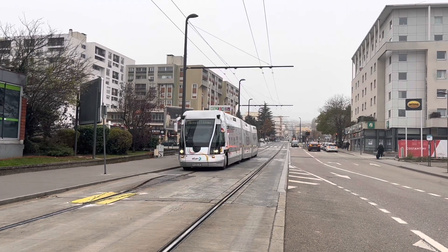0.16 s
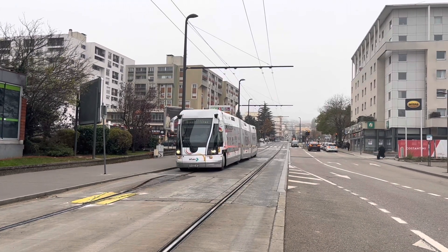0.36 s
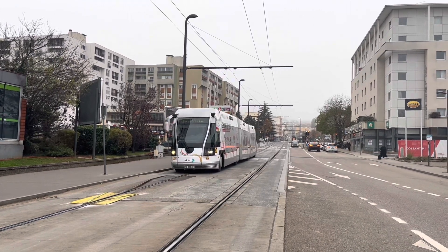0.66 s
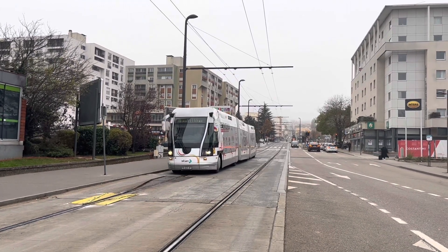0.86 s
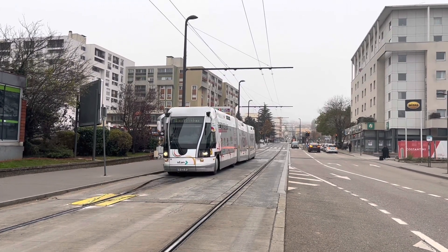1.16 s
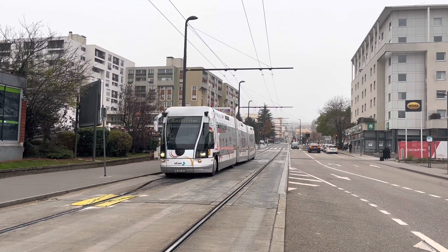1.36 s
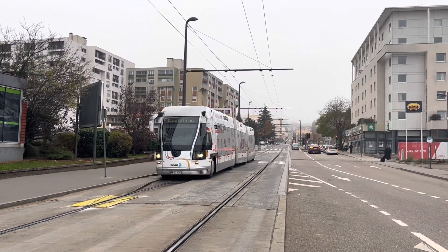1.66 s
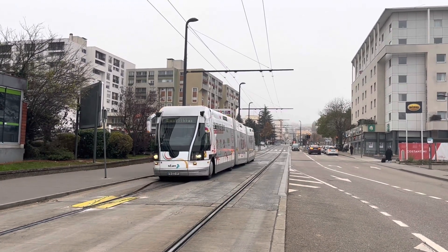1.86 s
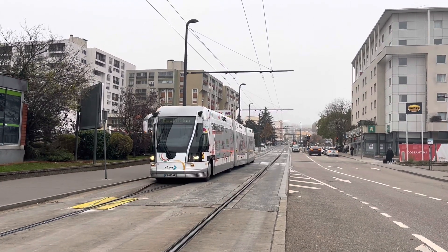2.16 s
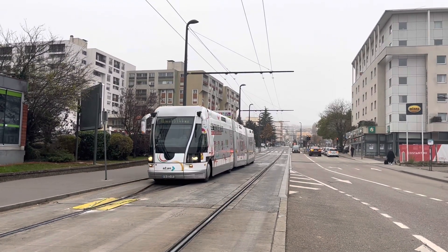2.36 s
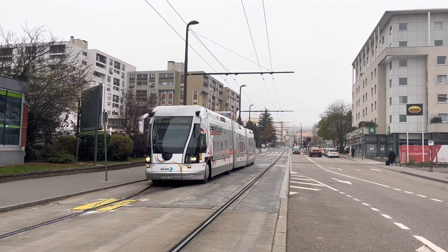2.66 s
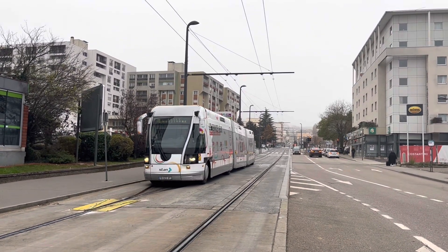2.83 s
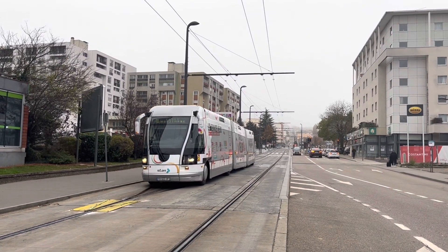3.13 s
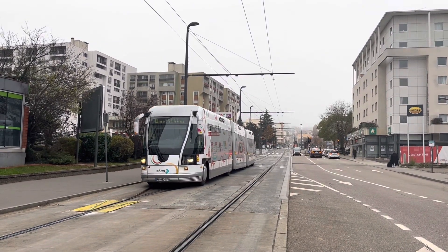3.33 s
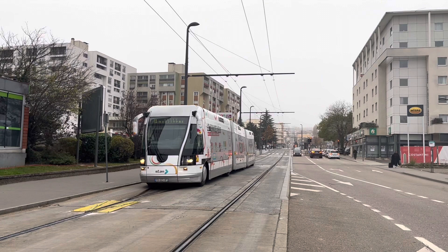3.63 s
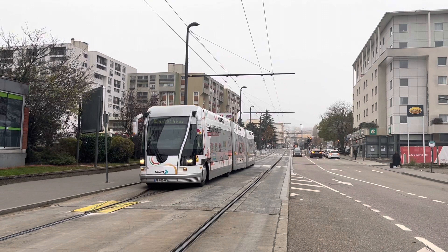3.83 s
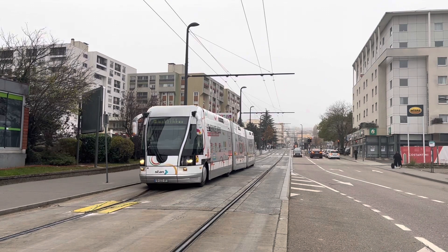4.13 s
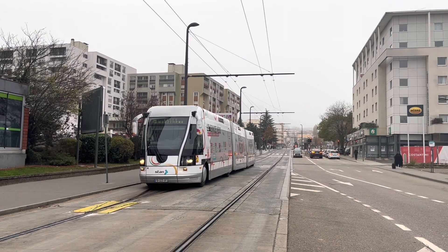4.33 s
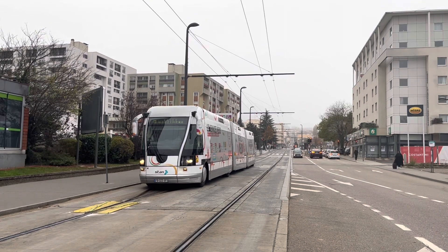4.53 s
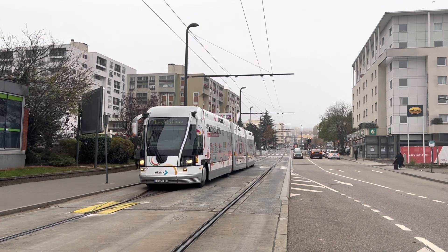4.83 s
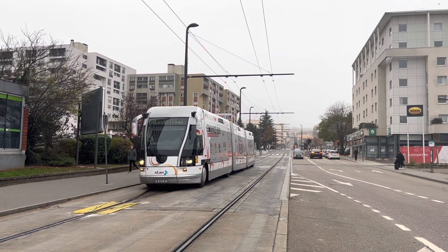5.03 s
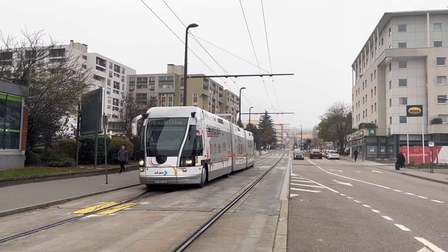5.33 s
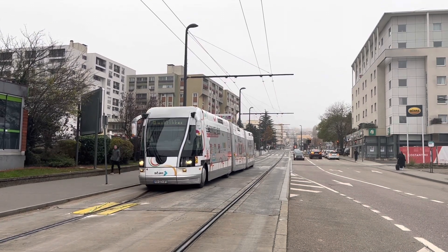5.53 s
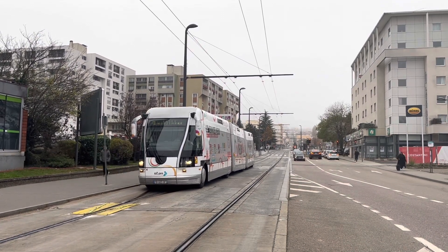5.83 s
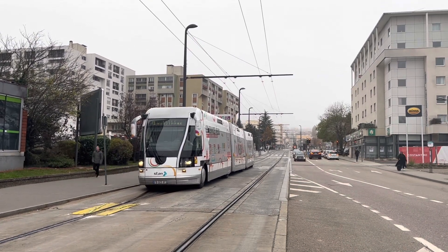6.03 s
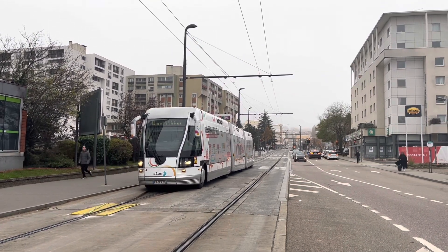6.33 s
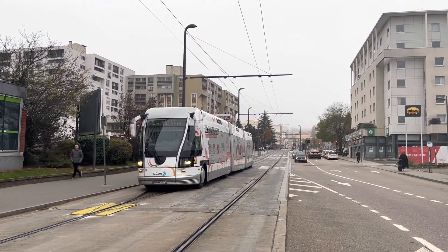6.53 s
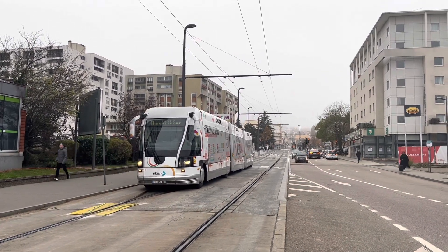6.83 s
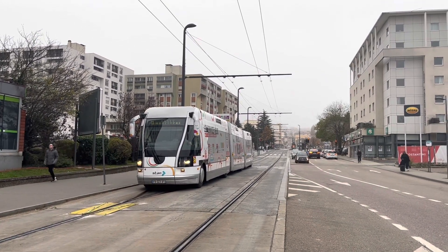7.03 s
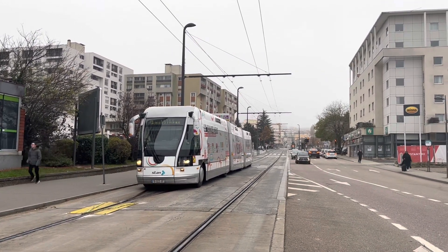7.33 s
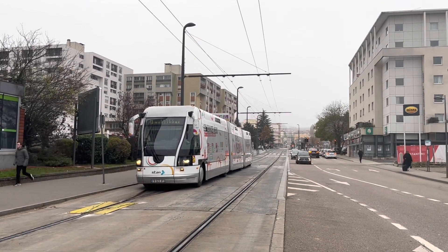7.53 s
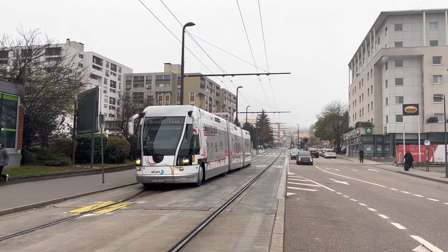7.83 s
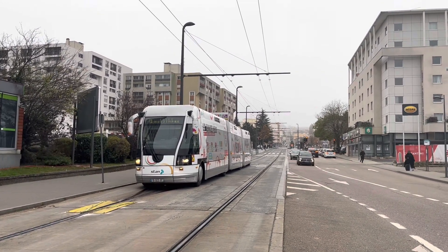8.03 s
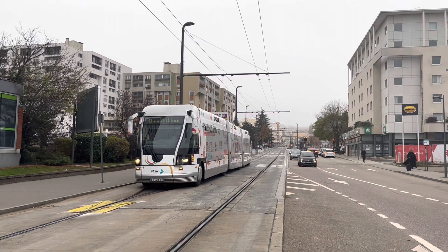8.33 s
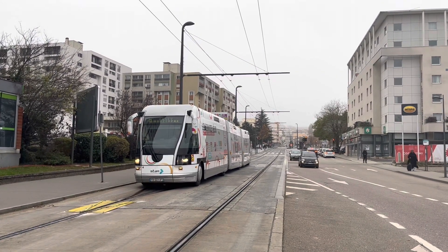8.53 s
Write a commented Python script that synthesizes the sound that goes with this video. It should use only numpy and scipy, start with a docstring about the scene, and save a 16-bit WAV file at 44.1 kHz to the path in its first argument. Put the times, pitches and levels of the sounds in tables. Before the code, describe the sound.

A windy city street, heard by an exposed stereo microphone near the track. Dull traffic and rolling roar, faint fan hum and low, flickering wind continue throughout. From 0 s a tram slightly to the left brakes: a rough, throbbing electric whine drops in small steps about every quarter second, becoming smoother and purer after 0.7 s and fading by 2.4 s. A low, wavering two-tone groan sinks beneath it from about 0.8 to 2.5 s. Faint high whistles begin at 2.3 s; thin, unsteady brake squeals sing from 2.9 to 4.1 s. Valves tick and puff from 3.6 s, with the strongest air blast at 5 s. Wind thumps hit hard at 1.9, 5.3 and 6.5-7 s. After a brief hiss at 7.6 s, a car swells past at 7.9 s, slamming a loose iron cover with loud, chattering clanks at 8.03 and 8.22 s, leaving a short street echo.

```python
"""Wind noise (flickering low noise, damped sine thumps), rolling roar of tram and traffic and fan hum run throughout.
A tram brakes a little to the left: stepped, phase-swung inverter whine, then a groan of two falling gear tones.
From 2.3 s short high whistles sound, and two brake discs squeal as wavering tones.
From 3.6 s valves tick and blow coloured hiss; from 7.9 s a car passes with a swell of hiss,
and its two axles clank a loose iron cover: random contacts ring its modes.
House fronts add a decaying wash; two microphone ports differ in phase and level."""
import sys
import numpy as np
from scipy import signal
from scipy.fft import rfft, irfft, next_fast_len
from scipy.io import wavfile
from scipy.ndimage import uniform_filter1d

SR = 44100
rng = np.random.default_rng(int(sys.argv[2]) if len(sys.argv) > 2 else 0)


def digitize_waveform(pressure):
    """Quantize a signal to 16-bit integers and store it at the path in sys.argv[1].

    Rows of a 2-D input are taken as channels; values are limited to [-1, 1].
    """
    field = np.atleast_2d(pressure).T
    bounded = np.clip(field, -1, 1)
    quanta = np.round(bounded * 32767).astype(np.int16)
    wavfile.write(sys.argv[1], SR, quanta)


N = 382562
T = np.arange(N) / SR

# Rolling roar of tram and traffic: t/s, level/dB, gain of added treble/dB
ROAR_LEVELS = [(0, -39.5, 2.5), (2.5, -38.5, -1.5), (4.9, -38, -4.5), (6.93, -35.5, -14), (7.8, -36.5, -11),
               (7.9, -36.5, 10), (8.2, -31.5, 5.5), (8.5, -32, -3), (8.67, -35.5, -9)]
# Roar spectrum: f/Hz, level/dB
ROAR_COLOUR = [(60, 5), (200, -1), (400, -3), (700, -7), (1100, -7), (1500, -15), (1900, -13), (2300, -23),
               (3500, -27), (5000, -37), (7000, -41.5), (9000, -45.5), (12000, -53), (14500, -63.5)]
# Tram roof fans: f/Hz, level/dB
FAN_LINES = [(619.1, -51), (1233, -61)]

# Steady wind on the microphone: t/s, level/dB
STEADY_WIND = [(0, -27), (.7, -33.5), (.85, -36.5), (1.76, -32.5), (2.4, -33), (3.3, -30.5), (4.3, -32),
               (4.7, -29), (6.9, -29.5), (7.2, -42.5), (7.9, -30.5), (8.67, -29.5)]
# Wind pressure spectrum: f/Hz, level/dB
WIND_COLOUR = [(20, -38), (36, -12.5), (50, -0.5), (70, -4), (110, -13.5), (200, -29.5), (500, -41)]
# Buffeting spectrum: f/Hz, level/dB
BUFFET_COLOUR = [(40, -30.5), (100, 2.5), (150, 0), (250, -5), (400, -16.5), (800, -43)]
# Gusts: t/s, level/dB, buffeting relative to gust/dB
GUSTS = [(.05, -24.5, -4), (2.0, -26.5, -16), (2.44, -23.5, -10), (2.79, -23, -4.5), (2.92, -22, -13.5),
         (3.27, -25.5, -4), (4.781, -21.5, -7.5), (4.88, -21, -22), (5.38, -22.5, -9), (5.62, -26.5, -15),
         (5.89, -22, -10.5), (6.16, -24.5, -21), (6.54, -21.5, -18.5), (6.73, -22.5, -18), (6.9, -22, -9.5)]
GUST_RISE_DB_PER_S, GUST_FALL_DB_PER_S = 91, 103.5
STEADY_BUFFET_DB = -7  # relative to steady wind
# Single eddies: t/s, envelope peak/dB, f/Hz
THUMPS = [(1.895, -13.5, 156), (2.418, -18.5, 121.5), (2.721, -22.5, 121.5), (2.834, -21.5, 120),
          (3.198, -18.5, 120), (5.289, -17.5, 127), (5.351, -14.5, 194), (5.909, -24, 217),
          (6.541, -14, 120), (6.565, -14, 177), (6.834, -11.5, 169), (6.939, -11, 204), (6.965, -18, 247),
          (7.004, -16.5, 173)]
THUMP_CYCLES = 0.46  # Gaussian half-width at 1/e

# Inverter, held between steps: t/s, switching f/Hz, level/dB
INVERTER_STEPS = [(0, 1170, -47), (0.248, 1108, -48), (0.492, 1066, -49), (0.681, 1075, -49),
                  (0.74, 1036, -52), (0.99, 1001, -49), (1.21, 965, -47.5), (1.44, 932, -52.5),
                  (1.68, 884, -54.5), (1.92, 842, -54.5), (2.158, 808, -60), (2.389, 804, -82.5),
                  (2.95, 800, -106)]
# Motor rotation before slip: t/s, f/Hz
MOTOR_RATE = [(0, 26.4), (.6, 24.6), (3.0, 2.74)]
# Switching harmonics: multiple of switching f, level under hard braking/dB, level once eased/dB
SWITCHING_HARMONICS = [(1, 7, 7.5), (2, -9, -3), (3, -1, 2), (3.5, -12, -9.5), (4, -17.5, -2.5),
                       (5, -13.5, -12), (6, -12, -11), (7, -20, -11.5), (8, -22, -10)]
# Motor housing response: f/Hz, gain/dB
HOUSING_COLOUR = [(800, -20), (885, 2.5), (960, -9.5), (1020, -6), (1070, 13), (1150, 0), (1250, -14.5),
                  (1700, -27), (1860, 7), (1930, -8.5), (2010, 0.5), (2150, -26), (2330, 2), (2430, -6),
                  (2560, -7.5), (2700, -13), (2900, -10), (3200, 1.5), (3400, -10), (3560, 5.5),
                  (3670, -0.5), (3800, -14), (4300, -47), (5100, -1.5), (5700, -3), (7000, -26)]
# Per driven axle: share of the motor rate
AXLE_SLIP = [0.92, 0.99, 1.018]
# Per driven axle: inverter step lag/s
AXLE_STEP_LAG_S = [-.015, 0, .035]
# Per driven axle, nearest loudest: gain/dB
AXLE_GAIN_DB = [-4, 4, -3]
HARD_SWING_RAD, EASED_SWING_RAD = 2.57, 0.47
BRAKING_EASES_S, SWING_FADE_PER_S = 0.68, 0.42
TILT_DB_PER_OCTAVE_S = 1.22  # grows each second once braking eases
CREEP_S, CREEP_TILT_DB_PER_OCTAVE = 2.39, 8
CALM_DB = -5  # part of each harmonic that swings no wider than the first
THROB_SHARE, IN_STEP_S = 0.7, 0.585  # axles throb together at IN_STEP_S

STREET_DB, STREET_T60_S = -13, 0.47

# Gear meshes: f at the swell/Hz, t/s, level/dB, rise/(dB/s), hold/s, fall/(dB/s)
GEAR_MESHES = [(141.2, 1.3, -39, 21.5, 0.59, 30), (293.5, 0.75, -43.5, 75, 0.28, 24)]
MESH_SAG_PER_S = 0.32  # exponential pitch decay rate

# Disc modes: t/s, f/Hz, level/dB
UPPER_DISC = [(2.86, 4330, -71), (2.906, 4331, -35.5), (2.94, 4333, -29), (2.98, 4335, -30),
              (3.003, 4354, -40.5), (3.05, 4340, -31), (3.14, 4350, -47.5), (3.17, 4357, -36),
              (3.232, 4360, -27.5), (3.3, 4368, -27.5), (3.372, 4364, -40.5), (3.4, 4366, -55),
              (3.435, 4340, -53), (3.55, 4330, -62)]
LOWER_DISC = [(2.92, 4280, -62), (2.97, 4295, -47), (3.02, 4285, -44), (3.056, 4304, -39.5),
              (3.166, 4274, -49.5), (3.226, 4281, -37), (3.29, 4284, -49), (3.345, 4290, -32),
              (3.37, 4292, -39), (3.41, 4305, -36.5), (3.5, 4290, -53), (3.54, 4296, -41),
              (3.596, 4302, -49), (3.628, 4300, -38.5), (3.74, 4310, -39.5), (3.82, 4308, -50.5),
              (3.855, 4312, -46.5), (3.885, 4312, -62), (3.97, 4313, -46), (4.034, 4340, -60),
              (4.05, 4330, -74), (4.085, 4308, -62), (4.12, 4305, -80)]
# Disc overtones, a row per disc: second relative to mode/dB, third relative to mode/dB
DISC_OVERTONES_DB = [(-36.5, -44), (-21.5, -36)]
# Short high whistles: t/s, length/s, first f/Hz, last f/Hz, level/dB
HIGH_WHISTLES = [(2.299, 0.2, 7600, 7650, -65), (2.828, 0.13, 8900, 9200, -56),
                 (2.934, 0.14, 10700, 11000, -60), (2.98, .23, 8300, 8500, -64),
                 (3.16, 0.14, 9330, 9450, -60.5), (3.298, 0.26, 9300, 9200, -53.5),
                 (3.38, 0.29, 10600, 10650, -68), (2.978, 0.33, 12800, 12950, -66),
                 (3.356, 0.48, 13050, 13260, -69), (3.72, 0.2, 8620, 8900, -63),
                 (7.7, 0.18, 5010, 5005, -64)]
TRAM_PAN_DB, SQUEAL_PAN_DB = 0.6, 3  # left minus right

# Air jets, and at 7.95 s the hissing swell of a passing car:
# t/s, level/dB, rise/(dB/s), hold/s, fall/(dB/s, sign ignored)
HISS_SWELLS = [(3.625, -53, 189, 0.0059, 88), (4.32, -55, 300, .01, 43), (4.74, -89, 57, .01, 100),
               (4.955, -41, 506, 0.095, 65), (5.22, -49, 61, 0.047, 110), (6.016, -65, 160, .01, 44),
               (7.6, -65, 22, .01, 53), (7.615, -51, 2000, .1, -3), (7.95, -50, 40, 0.31, 16)]
# Hiss spectrum: f/Hz, level/dB
HISS_COLOUR = [(900, -27), (1700, 5), (2600, -3), (3300, -3), (4200, -4.5), (5500, -2.5), (6600, -3),
               (8500, 0), (10500, -4.5), (12000, -5), (14000, -4.5), (14500, -2.5)]
# Pipe resonances: f/Hz, width/Hz, lift/dB
PIPE_RESONANCES = [(2410, 170, 10), (2860, 200, 11), (3150, 150, 9), (5020, 240, 4), (6550, 160, 5),
                   (11500, 200, 7), (12200, 120, 9), (13000, 180, 4)]
# Valve ticks: t/s, envelope level/dB
VALVE_TICKS = [(3.64, -41), (4.0194, -54), (4.1944, -52), (4.92, -43), (6.3555, -54), (7.6161, -49)]
LEAK_DB = -75.5

# Wheel blows: t/s, level/dB, twice the decay time/s, crack relative to level/dB,
# gain of modes below 1500 Hz/dB, treble gain/dB, favoured mode f/Hz
WHEEL_BLOWS = [(7.918, -31, 0.026, -4, -8, -9, 1900), (8.0254, -9.5, 0.037, 1.5, 0, 0.5, 6300),
               (8.06, -18, 0.024, 0, 4, -3, 870), (8.114, -24, 0.014, -6, -4, -18, 1900),
               (8.218, -8.5, 0.041, -1, 1.5, -5, 5400), (8.251, -18, 0.021, -0.5, -5.5, -5, 735)]
# Cover modes: f/Hz, level/dB, t60/s
COVER_MODES = [(113, -1.5, 0.22), (231, -5.5, 0.16), (285.4, -5.5, 0.19), (338, -13.5, 0.4),
               (421.6, -2.5, 0.27), (486, -8, 0.28), (602, -9.5, 0.22), (666, -6, 0.11), (724, -5.5, 0.073),
               (865, -0.5, 0.06), (969, -5, 0.14), (1013, -1, 0.057), (1245, -5, 0.1), (1260, -24, 0.1),
               (1820, 2, 0.05), (1830, -3, 0.059), (2800, -10.5, 0.051), (3180, -12.5, 0.035),
               (3970, -35, .06), (5330, -19, 0.052), (6260, -26.5, 0.048), (11800, -28, 0.15)]
# Impact noise spectrum: f/Hz, level/dB
CRACK_COLOUR = [(100, -2), (300, 4.5), (1000, 3), (2000, -8), (3200, -6), (4200, -18), (6000, -16.5),
                (9000, -27), (11800, -21), (14500, -29)]
MODE_SPLIT_SHARE, MODE_SCATTER_DB = 0.03, 3  # standard deviations
FAVOURED_MODE_DB, COVER_SIDE_DB = 11, -12

# Unrelated side signal: f/Hz, side minus mid/dB
SIDE_COLOUR = [(60, -17), (200, -13), (400, -10.5), (800, -7.5), (1400, 0), (2000, -12), (3000, -18),
               (5000, -3), (7000, -5.5), (8000, -49.5), (9000, -19.5), (10000, 0), (11500, -22),
               (13000, -14), (14500, -20)]
# Microphone ports: f/Hz, phase lead of right/rad
PORT_LEAD = [(100, 0.06), (700, 0.6), (2000, 0.5), (2800, -1.5), (5200, -0.2), (6000, 1.24), (7000, -2),
             (7500, 4.5), (7800, np.pi), (9100, np.pi), (10000, 5.5), (10800, 2 * np.pi),
             (13200, 2 * np.pi), (14500, 10)]
# Microphone ports: f/Hz, left minus right/dB
PORT_BALANCE = [(1000, 0), (1400, -2), (2000, 1.5), (3000, 1), (5000, 4), (6500, -0.5)]
TOP_HZ = 14750


def undb(db):
    """Amplitude from dB."""
    return 10 ** (np.asarray(db) / 20)


def on_hz(table, hz):
    """Value of a (Hz, value) table, linear in log frequency."""
    table_hz, values = np.transpose(table)
    return np.interp(np.log(np.maximum(hz, 1)), np.log(table_hz), values)


def columns(table, t):
    """Columns of a time table, interpolated at t."""
    table_s, *curves = np.transpose(table)
    return [np.interp(t, table_s, curve) for curve in curves]


def colour(x, table):
    """Zero-phase filter along time by a (Hz, dB) table."""
    size = next_fast_len(x.shape[-1])
    gain = undb(on_hz(table, np.fft.rfftfreq(size, 1 / SR)))
    return irfft(rfft(x, size) * gain, size)[..., :x.shape[-1]]


def unit(x):
    """Scale to rms 1."""
    return x / np.sqrt(np.mean(x ** 2))


def walk(rate_hz):
    """Random levels, one per 1 / rate_hz, slewed; rms 1."""
    hold = int(SR / rate_hz)
    levels = np.repeat(rng.standard_normal(N // hold + 1), hold)[:N]
    return unit(uniform_filter1d(levels, hold))


def stereo(mid, side):
    """Left and right from a centre and an unrelated side signal."""
    side = colour(side, SIDE_COLOUR)
    return np.array([mid + side, mid - side])


def hiss(table, flicker_db, rate_hz, octaves):
    """Stereo noise, mid rms 1; bands centred on 2**octave Hz flicker independently."""
    size = next_fast_len(N)
    hz = np.fft.rfftfreq(size, 1 / SR)
    spectra = rfft(rng.standard_normal((2, size))) * undb(on_hz(table, hz))
    noise = 0
    for octave in range(*octaves):
        distance = np.clip(np.log2(hz + 1) - octave, -1, 1)
        mask = np.cos(np.pi / 2 * distance) ** 2
        band = irfft(spectra * mask, size)[:, :N]
        noise = noise + band * undb(flicker_db * walk(rate_hz))
    mid, side = noise / np.sqrt(np.mean(noise[0] ** 2))
    return stereo(mid, side)


def tone(hz, db):
    """Sine of varying pitch, random phase, rms level db."""
    cycles = np.cumsum(hz) / SR + rng.random()
    return np.sqrt(2) * undb(db) * np.sin(2 * np.pi * cycles)


def swell(start_s, db, rise_db_per_s, hold_s, fall_db_per_s):
    """Gain that rises to db at start_s, holds and falls, linear in dB."""
    before_s = np.maximum(start_s - T, 0)
    after_s = np.maximum(T - start_s - abs(hold_s), 0)
    return undb(db - abs(rise_db_per_s) * before_s - abs(fall_db_per_s) * after_s)


def bursts(starts_s, levels_db, decays_s, rise_s):
    """Sum of envelopes that rise quickly and decay exponentially."""
    envelope = np.zeros(N)
    for start_s, db, decay_s in zip(starts_s, levels_db, decays_s):
        t = np.maximum(T - start_s, 0)
        envelope += undb(db) * (1 - np.exp(-t / rise_s)) * np.exp(-t / decay_s)
    return envelope


def road():
    """Rolling roar of tram and traffic; its treble fades and returns as a car passes. Roof fans hum."""
    db, treble_db = columns(ROAR_LEVELS, T)
    roar = hiss(ROAR_COLOUR, 1.3, 10, octaves=(6, 15))
    treble = colour(roar, [(1200, -67), (2500, -4.0)])
    hum = sum(tone(hz * (1 + 0.004 * walk(3)), line_db + 4 * walk(10)) for hz, line_db in FAN_LINES)
    return (roar + treble * undb(treble_db)) * undb(db) + hum


def wind():
    """Slow pressure swings, rougher buffeting above them, and single eddies of a cycle or two."""
    steady = undb(columns(STEADY_WIND, T)[0])
    gusts = np.array([swell(s, db, GUST_RISE_DB_PER_S, 0, GUST_FALL_DB_PER_S) for s, db, _ in GUSTS])
    gust_buffets = undb(np.array(GUSTS)[:, 2:]) * gusts
    pressure_gain = np.maximum(steady, gusts.max(0))
    buffet_gain = np.maximum(steady * undb(STEADY_BUFFET_DB), gust_buffets.max(0))
    out = hiss(WIND_COLOUR, 0.93, 9.1, octaves=(5, 9)) * pressure_gain
    out = out + hiss(BUFFET_COLOUR, 2.74, 20, octaves=(6, 10)) * buffet_gain
    for start_s, peak_db, hz in THUMPS:
        cycles = (T - start_s - 0.006) * hz
        out += undb(peak_db) * np.sin(2 * np.pi * cycles) * np.exp(-(cycles / THUMP_CYCLES) ** 2)
    return out


def whine():
    """Pulse edges swing at the motor rate, spreading each switching harmonic; the housing colours them."""
    n = int(INVERTER_STEPS[-1][0] * SR) + 4000
    t = T[:n]
    step_s, carrier_hz, step_db = np.transpose(INVERTER_STEPS)
    motor_hz = columns(MOTOR_RATE, t)[0]
    eased = uniform_filter1d(1. * (t > BRAKING_EASES_S), 400)
    since_eased_s = t - BRAKING_EASES_S
    eased_swing = EASED_SWING_RAD * np.exp(-SWING_FADE_PER_S * since_eased_s)
    swing_rad = HARD_SWING_RAD * (1 - eased) + eased_swing * eased
    tilt_db = TILT_DB_PER_OCTAVE_S * since_eased_s * eased + CREEP_TILT_DB_PER_OCTAVE * (t > CREEP_S)
    turns = np.cumsum(motor_hz) / SR
    turns = turns - turns[int(IN_STEP_S * SR)]

    clocks, swings, gains, throbs = [], [], [], []
    for slip, lag_s, axle_db in zip(AXLE_SLIP, AXLE_STEP_LAG_S, AXLE_GAIN_DB):
        held = np.maximum(np.searchsorted(step_s + lag_s, t, "right") - 1, 0)
        turn = 2 * np.pi * slip * turns
        edge_motion = np.sin(turn) + 0.5 * np.sin(2 * turn + 6 * rng.random()) + 0.29 * walk(90)[:n]
        swings.append(swing_rad * edge_motion)
        clocks.append(2 * np.pi * (np.cumsum(carrier_hz[held]) / SR + rng.random()))
        gains.append(undb(axle_db + uniform_filter1d(step_db[held], size=400)))
        throbs.append(THROB_SHARE * (1 - eased) * np.cos(turn))
    clocks, swings, throbs = np.array(clocks), np.array(swings), np.array(throbs)

    lines = 0
    for k, hard_db, eased_db in SWITCHING_HARMONICS:
        waver_db = 1.5 * walk(30)[:n]
        db = hard_db + (eased_db - hard_db) * eased + tilt_db * np.log2(k) + waver_db
        wide = np.sin(k * (clocks + swings))
        calm = undb(CALM_DB) * np.cos(k * clocks + swings)
        axles = gains * (1 + throbs / k) * (wide + calm)
        lines = lines + undb(db) * axles.sum(0)
    return np.pad(colour(lines, HOUSING_COLOUR), (0, N - n))


def street(x):
    """House fronts return a decaying wash, slightly brighter in the treble, unrelated left and right."""
    t = T[:SR]
    noise = colour(rng.standard_normal((2, SR)), [(1000, -2.2), (8000, -0.25)])
    tail = noise * 1000 ** (-t / STREET_T60_S) * (t > 0.02)
    tail = tail / np.sqrt(np.sum(tail[0] ** 2))
    return undb(STREET_DB) * signal.fftconvolve(x[None], tail)[:, :N]


def gears():
    """Two gear meshes wind down as a rough, wavering groan of falling tones."""
    groan = 0
    for mesh_hz, start_s, *shape in GEAR_MESHES:
        hz = mesh_hz * np.exp(-MESH_SAG_PER_S * (T - start_s)) * (1 + 0.035 * walk(30))
        groan = groan + tone(hz, 3 * walk(11.53)) * swell(start_s, *shape)
    return groan


def squeal():
    """Each disc sings a mode with patchy stick-slip overtones; short wavering high whistles sound around them."""
    out = np.zeros(N)
    for disc, overtones_db in zip((UPPER_DISC, LOWER_DISC), DISC_OVERTONES_DB):
        hz, db = columns(disc, T)
        song = tone(hz, 1.1 * walk(35))
        for multiple, overtone_db in enumerate(overtones_db, start=2):
            song = song + tone(multiple * hz, overtone_db + 4 * walk(14))
        gate = uniform_filter1d(1. * (T > disc[0][0]) * (T < disc[-1][0]), 800)
        out += song * undb(db) * gate
    for start_s, length_s, first_hz, last_hz, db in HIGH_WHISTLES:
        start, n = int(start_s * SR), int(length_s * SR)
        hz = np.linspace(first_hz, last_hz, n) * (1 + 0.006 * walk(120)[:n])
        out[start:start + n] += np.hanning(n) ** 0.5 * tone(hz, db + 3 * walk(26.6)[:n])
    return out


def valves_and_car_hiss():
    """Air jets with pipe resonances over a faint leak, dry valve ticks; a passing car swells in the same hiss."""
    tick_s, tick_db = np.transpose(VALVE_TICKS)
    ticks = bursts(tick_s, tick_db, np.full(len(tick_s), 0.006), 0.00017)
    hz = np.geomspace(500, 16000, 800)
    db = on_hz(HISS_COLOUR, hz)
    for pipe_hz, width_hz, lift_db in PIPE_RESONANCES:
        db = db + lift_db / (1 + (2 * (hz - pipe_hz) / width_hz) ** 2)
    gain = undb(LEAK_DB) + sum(swell(*shape) for shape in HISS_SWELLS) + ticks
    return hiss(np.transpose([hz, db]), 2.4, 30, octaves=(11, 15)) * gain


def cover():
    """Each wheel slams the cover, which chatters in its frame; every blow rings its modes differently."""
    t = T[:SR // 2]
    hz, mode_db, t60_s = np.array(COVER_MODES).T[:, :, None]
    out = 0
    for start_s, db, length_s, crack_db, low_db, treble_db, favoured_hz in WHEEL_BLOWS:
        # three close partners per mode
        level_chance, pitch_chance, phase_chance = rng.standard_normal((3, 3, len(COVER_MODES), 1))
        favour_db = FAVOURED_MODE_DB * (abs(hz / favoured_hz - 1) < 0.04)
        gain = undb(mode_db + low_db * (hz < 1500) + favour_db + MODE_SCATTER_DB * level_chance)
        partner_hz = hz * (1 + MODE_SPLIT_SHARE * pitch_chance * (hz < 4000))
        partners = gain * np.sin(2 * np.pi * partner_hz * t + 3 * phase_chance) * 1000 ** (-t / t60_s)
        ring = partners.sum((0, 1))
        # some 1800 contacts a second
        chatter = rng.uniform(-1.63, 2.05, (2, N)) * (rng.random((2, N)) < 0.04)
        contacts = chatter * bursts([start_s], [db - 22.5], [0.5 * length_s], 0.002)
        iron = signal.fftconvolve(contacts, ring[None])[:, :N]
        noise = colour(rng.standard_normal((2, N)), CRACK_COLOUR)
        crack = noise / np.std(noise[0]) * bursts([start_s], [db + crack_db], [0.5 * length_s], 0.002)
        out = out + colour(iron + crack, [(3000, 0), (9000, treble_db)])
    return stereo(out[0], out[1] * undb(COVER_SIDE_DB))


def scene():
    """Tram panned left, cover, their street wash, hiss, wind and road."""
    half_pan = np.array([[0.5], [-0.5]])
    motors, brakes, iron = whine() + gears(), squeal(), cover()
    tram = motors * undb(half_pan * TRAM_PAN_DB) + brakes * undb(half_pan * SQUEAL_PAN_DB)
    wash = street(motors + brakes + iron.mean(0))
    return tram + iron + wash + valves_and_car_hiss() + wind() + road()


def record(dry):
    """Two ports differ in phase and level by frequency, opposed near 8 kHz; the top is cut."""
    size = next_fast_len(N)
    hz = np.fft.rfftfreq(size, 1 / SR)
    right = np.exp(0.5j * on_hz(PORT_LEAD, hz)) / undb(on_hz(PORT_BALANCE, hz) / 2)
    left = np.conj(right) / abs(right) ** 2
    ports = irfft(rfft(dry, size) * [left, right], size)[:, :N]
    low_pass = signal.ellip(10, 0.2, 80, TOP_HZ, fs=SR, output="sos")
    return signal.sosfilt(low_pass, ports)


dry = scene()
out = record(dry)
digitize_waveform(out)
```